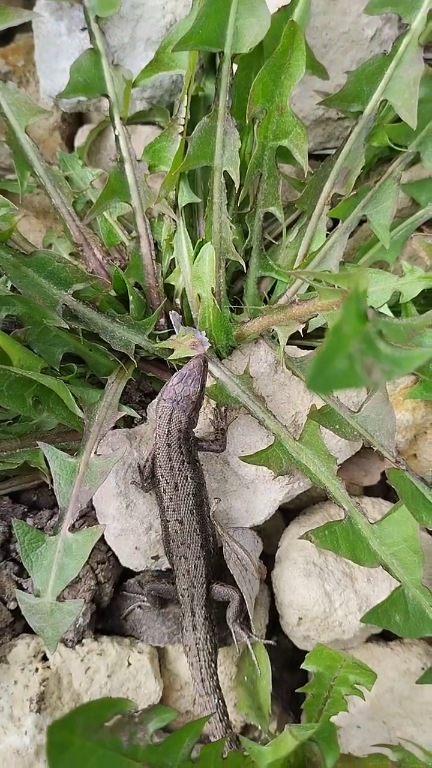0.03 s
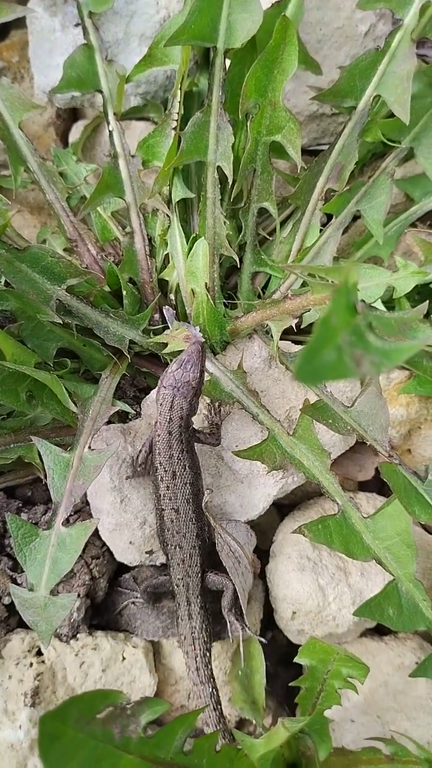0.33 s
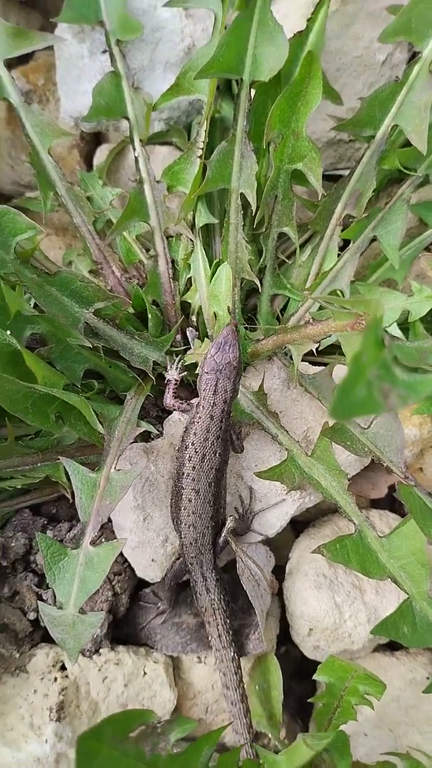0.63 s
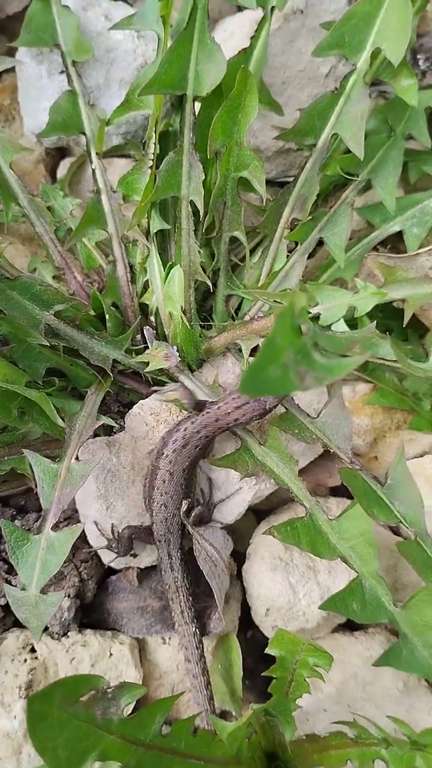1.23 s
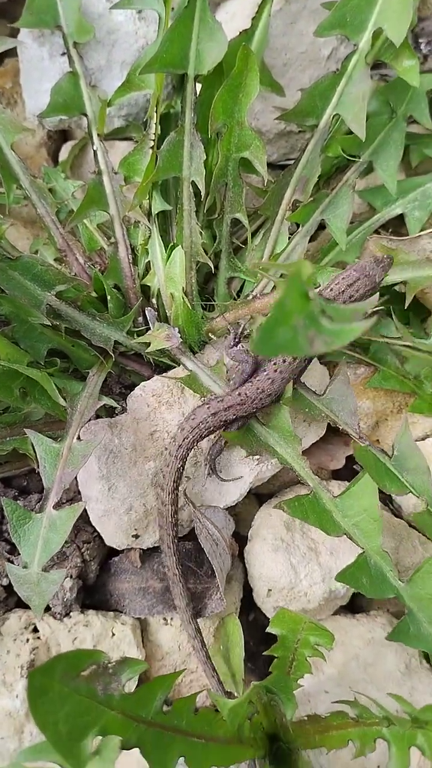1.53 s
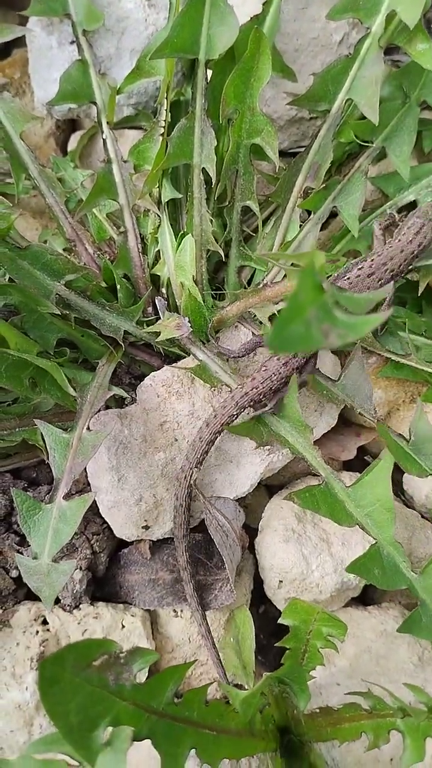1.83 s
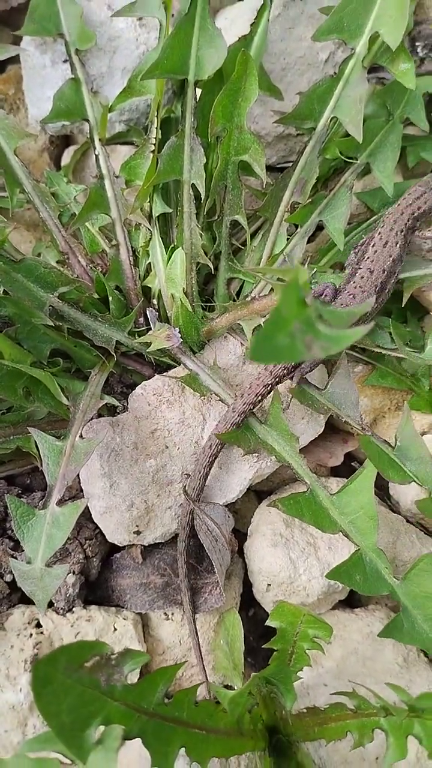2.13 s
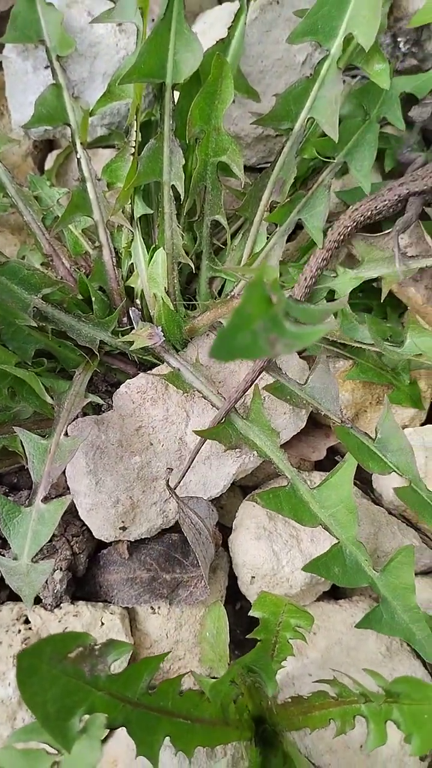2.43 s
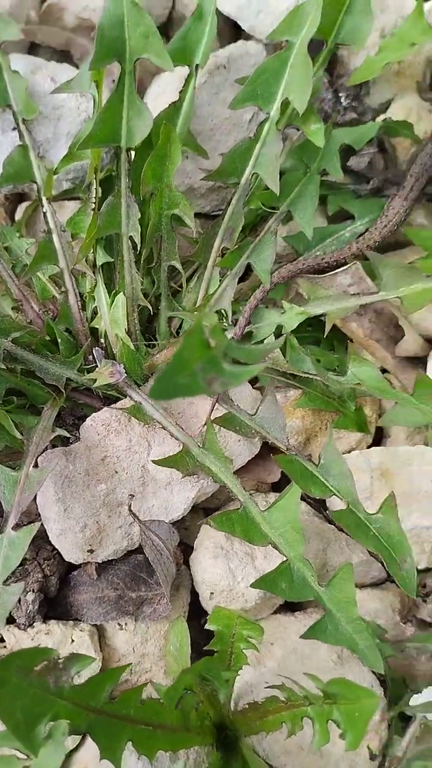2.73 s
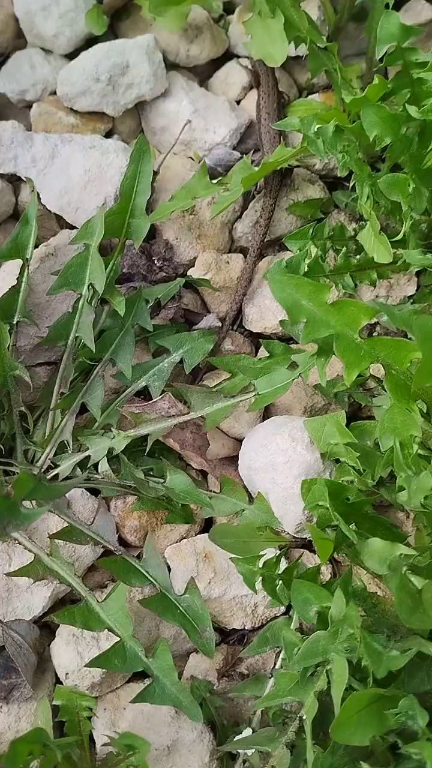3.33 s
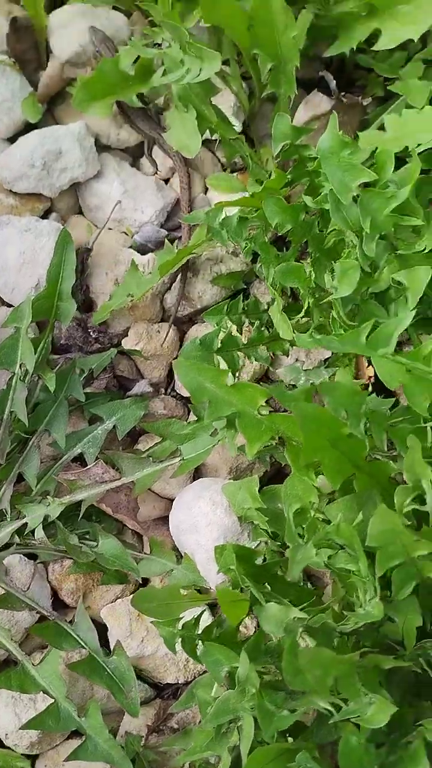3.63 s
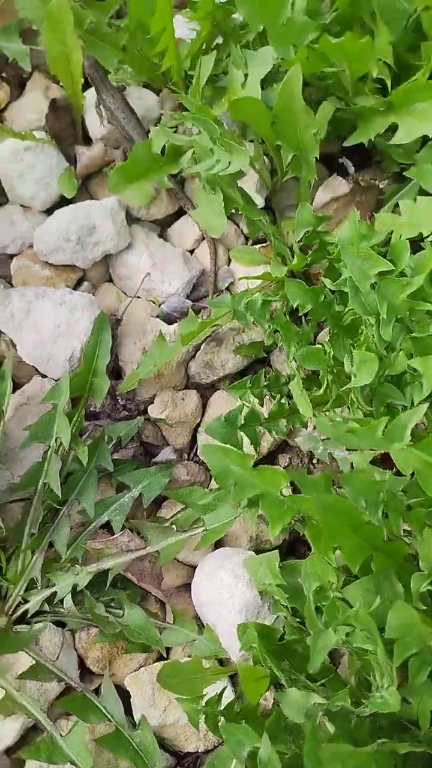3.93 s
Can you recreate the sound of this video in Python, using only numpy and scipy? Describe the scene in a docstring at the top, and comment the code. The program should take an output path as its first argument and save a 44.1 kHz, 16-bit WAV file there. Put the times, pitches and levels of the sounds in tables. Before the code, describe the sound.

A small lizard creeps, then darts over dry leaves and stones with faint ticks and crackly scrapes, close by. Low wind puffs bump the microphone more and more, over soft outdoor air and a distant machine hum.

```python
"""Among weeds, on dry leaves and stones, a small lizard creeps and then darts, close to the microphone. Its
feet tick by impact, and now and then a twig snaps; its belly scrapes by friction, in crackling strokes that can
ring a curled leaf, and at last it swishes through green leaves. A few very short, thin chirps sound above. Wind
eddies bump the microphone in separate puffs, over soft outdoor air and a distant machine hum."""
import sys
import numpy as np
from scipy import signal
from scipy.fft import rfft, irfft
from scipy.io import wavfile

SR = 44100
rng = np.random.default_rng(int(sys.argv[2]) if len(sys.argv) > 2 else 0)


def generate_wav(sig):
    """Save sig (samples, or channels by samples) to the path in sys.argv[1] as 16-bit PCM at SR."""
    pcm = np.round(np.clip(np.atleast_2d(sig).T, -1, 1) * 32767).astype(np.int16)
    wavfile.write(sys.argv[1], SR, pcm)


N = 176400
TIME, HZ = np.arange(N) / SR, np.fft.rfftfreq(N, 1 / SR)

# spectra of the steady air and of the growing wash (frequency [Hz], relative density [dB])
AIR_SPECTRUM = [(120,-11.5),(200,0.5),(280,-6),(430,-2),(560,-9),(720,-9.5),(1050,-25),(1700,-16),(2500,-20),(3300,-20.5),(5000,-25),(6800,-27.5),(8700,-18.5),(12000,-29.5),(15500,-26.5)]
WASH_SPECTRUM = [(100,10.5),(250,-1.5),(400,6.5),(700,2.5),(1000,-6.5),(1700,-5.5),(2500,-14.5),(3400,-16),(5500,-21),(8500,-22.5),(12000,-27),(16000,-25)]
# envelopes of the wash and of a mid-range hiss (time [s], level [dB])
WASH_ENVELOPE = [(0,-75.5),(1.2,-72.5),(1.9,-64.5),(2.6,-63),(2.95,-57.5),(3.25,-60.5),(3.45,-62),(3.8,-59.5),(4,-61)]
HISS_ENVELOPE = [(2.4,-76.5),(3.25,-65.5),(3.5,-67.5),(3.8,-64.5),(4,-71.5)]
# machine partials (frequency [Hz], level before the shared gain [dB])
PARTIALS = [(302,-72.5),(378,-74.5),(604,-76),(666,-82.5),(714,-80.5),(780,-77),(858,-84),(1109,-96),(1461,-82)]
# gain shared by the partials (time [s], gain [dB])
PARTIAL_GAIN = [(0,-9),(1.8,-4.5),(2.9,3.5),(4,-0.5)]
# eddies at the microphone (middle [s], level [dB], Gaussian width [s], corner frequency [Hz])
EDDIES = [(0.48,-35.5,0.029,98),(0.521,-33,0.026,56),(0.573,-41.5,0.093,74.6),(0.869,-31.5,0.012,34.5),(0.908,-34.5,0.023,74),(1.269,-39.5,0.11,69),(1.43,-32,.018,78),
          (1.746,-36,0.014,69),(1.781,-27,0.017,57.7),(1.939,-36,0.021,60.3),(2.021,-35,0.011,59),(2.055,-35,0.029,49),(2.131,-29,0.033,35.3),(2.177,-26,0.0094,125),(2.198,-34,0.039,75),(2.337,-31,0.015,48),(2.485,-30,0.022,69.4),
          (2.734,-28.5,0.016,110),(2.766,-27,0.035,103),(2.884,-36,0.036,69),(2.938,-26,0.028,98),(2.995,-27,0.07,80),(3.035,-29,0.017,108),(3.106,-38.5,0.15,82),(3.289,-24,0.019,115),(3.379,-31,0.016,85),
          (3.563,-26,0.018,70.5),(3.691,-27,0.023,64),(3.753,-35,0.03,55.4),(3.836,-18.5,0.0061,70.6),(3.873,-27.5,0.022,75.6),(3.9,-33.5,0.03,70)]
# envelope of the low wind (time [s], level [dB])
RUMBLE_ENVELOPE = [(0,-63.5),(.44,-60),(.5,-50),(1.1,-47),(1.6,-49),(2.1,-44.5),(2.6,-43.5),(3.1,-38.5),(3.45,-46),(3.7,-30.5),(4,-40)]
# spectrum of the low wind (frequency [Hz], relative density [dB])
RUMBLE_SPECTRUM = [(15,9.5),(35,8.5),(70,-2.5),(130,-12),(220,-20.5),(400,-46),(900,-99)]
# thin chirps (time [s], peak level [dB], top frequency [Hz])
THIN_CHIRPS = [(0.046,-57,11500),(1.576,-57,11600),(1.6455,-54,11300),(1.75,-51,11470),(2.0268,-51.5,10940)]
# envelope of stray leaf crackles (time [s], level [dB])
CRACKLE_ENVELOPE = [(0,-84),(1.6,-76.5),(2.3,-72),(2.9,-77.5),(3.7,-71.5),(4,-86)]
# envelope of the run through green leaves (time [s], level [dB])
SWISH_ENVELOPE = [(3.42,-87),(3.59,-64.5),(3.86,-69.5),(3.95,-80)]
# response of dry leaf under the belly (frequency [Hz], relative density [dB])
LEAF_SPECTRUM = [(1200,3.5),(2050,11),(2750,-0.5),(3300,4.5),(4600,-2),(6000,-3.5),(7300,0.5),(9300,6.5),(12300,-6.5),(14700,2.5),(16000,-13)]
# resonances of a stiff curled leaf (frequency [Hz], bandwidth [Hz], relative level [dB])
CURL_MODES = [(5300,360,13.5),(5780,360,15),(6600,190,15),(8660,280,17)]
# body and tail sliding over leaves
# (start [s], length [s], level [dB], band centre [Hz], fullest point [share of length], ring [0-1])
STROKES = [(0.375,0.1,-74,10000,0.55,0),(0.455,0.088,-64.5,15000,.4,0),(0.468,.075,-68.5,900,0.31,0),(1.23,0.088,-71,4000,1,0),(1.387,0.075,-69,4500,0.59,0),(1.543,0.12,-70.5,13000,0.34,0),(1.856,0.036,-62,4500,0.41,0.03),(1.914,0.031,-61,4800,0.42,0.15),
           (2.053,0.15,-65.5,6200,0.9,0.01),(2.299,0.17,-58,5600,0.54,0.56),(2.431,0.076,-54,6600,0.82,0.75),(2.465,0.26,-65,6600,0.17,0.3),(2.724,0.14,-61.5,6400,0.46,0.1),(3.044,0.067,-63.5,12100,0.57,0)]
# feet on dry leaves and stones, and a few sharp twig snaps (time [s], level [dB], band centre [Hz], length [s])
TICKS_AND_SNAPS = [(.438,-64,8500,.003),(1.3935,-64,5300,.0017),(1.432,-65,9200,0.0027),(1.512,-64,9050,0.0043),
                   (1.625,-57.5,613,0.01),(1.826,-61.5,2110,0.0053),(1.886,-66,4440,0.0019),(1.929,-62,5600,.004),(1.97,-61,4470,0.0087),(2.009,-61.5,5700,0.013),
                   (2.069,-60.5,9200,0.0069),(2.147,-62,9500,.003),(2.206,-61.5,9700,0.0064),(2.263,-61.5,9400,0.0032),(2.287,-57.5,5740,0.0098),(2.348,-52,7000,0.0012),(2.375,-61,5200,0.0033),
                   (2.389,-53,4700,0.0043),(2.406,-50,5600,.0065),(2.536,-60,8700,0.0067),(2.692,-57,4360,0.00087),(2.804,-61,4540,0.0058),(3.01,-59.5,8200,0.01),(3.046,-60,10000,0.0038),
                   (3.182,-63.5,9200,0.0064),(3.206,-55,9700,0.0027),(3.21,-61.5,9200,0.011),(3.3515,-62,5600,0.0011),(3.4,-58,8000,0.0015),(3.423,-62,8000,0.0064),(3.651,-53,3180,0.0021)]


def amp(db):
    """Decibels to amplitude ratio."""
    return 10 ** (np.asarray(db) / 20)


def unit_rms(x):
    """Normalisation to rms 1."""
    return x / np.sqrt(np.mean(x ** 2) + 1e-30)


def envelope(points):
    """Gain over time from (time [s], level [dB]) points."""
    return amp(np.interp(TIME, *np.transpose(points)))


def spectrum(points):
    """Gain over frequency from (frequency [Hz], level [dB]) points."""
    hz, db = np.transpose(points)
    return amp(np.interp(np.log(HZ + 1), np.log(hz + 1), db))


def band(hz, centre_hz, octaves):
    """A broad resonance, Gaussian in log frequency."""
    return np.exp(-.5 * (np.log2((hz + 1) / centre_hz) / octaves) ** 2)


def lowpass(hz, edge_hz, order):
    """Maximally flat low-pass gain."""
    return 1 / np.sqrt(1 + (hz / edge_hz) ** (2 * order))


def filtered(x, gain):
    """Filtering as multiplication of the spectrum."""
    return irfft(rfft(x) * gain, len(x))


def noise(gain):
    """Gaussian noise of rms 1 with the given spectrum."""
    return unit_rms(filtered(rng.standard_normal(N), gain))


def drift(rate_hz):
    """Low-pass random fluctuation of rms 1."""
    return noise(np.exp(-(HZ / rate_hz) ** 2))


def add(mix, start, sound):
    """Superposition of a sound from a start time in seconds."""
    at = round(start * SR)
    part = mix[max(at, 0):max(at + len(sound), 0)]
    part += sound[max(-at, 0):][:len(part)]


def air():
    """Independent noises add in power: steady outdoor air, a growing, fluttering wash and a soft hiss."""
    bed = amp(-65.5) * noise(spectrum(AIR_SPECTRUM))
    flutter = amp(1.6 * drift(rate_hz=47))
    wash = envelope(WASH_ENVELOPE) * noise(spectrum(WASH_SPECTRUM)) * flutter
    hiss = envelope(HISS_ENVELOPE) * noise(band(HZ, centre_hz=1290, octaves=.57))
    return bed + wash + hiss


def machine():
    """Random frequency modulation makes a distant machine's hum and faint partials waver."""
    def tone(hz, db, waver_hz):
        frequency = hz + waver_hz * drift(rate_hz=8.86)
        return amp(db) * unit_rms(np.sin(2 * np.pi * np.cumsum(frequency) / SR))
    hum = tone(hz=101.5, db=-56, waver_hz=.72)
    partials = sum(tone(hz, db, waver_hz=2.79) for hz, db in PARTIALS)
    return hum + envelope(PARTIAL_GAIN) * partials


def wind():
    """Turbulent pressure: eddies hit the microphone as short dull puffs over a lumpy rumble."""
    puffs, size = np.zeros(N), 16384
    t, hz = (np.arange(size) - size // 2) / SR, np.fft.rfftfreq(size, 1 / SR)
    for middle, db, width, corner_hz in EDDIES:
        swirl = rng.standard_normal(size) * np.exp(-4 * (t / width) ** 2)
        phase = np.angle(rfft(swirl))
        magnitude = (hz / corner_hz) ** .53 * lowpass(hz, corner_hz, order=3.7)
        eddy = irfft(magnitude * np.exp(1j * phase)) * np.exp(-.5 * (t / width) ** 2)
        eddy = filtered(eddy, lowpass(hz, edge_hz=273, order=8))  # limit of the quickest eddies
        add(puffs, middle + t[0], amp(db) * eddy / np.linalg.norm(eddy) * np.sqrt(width * SR))
    rumble = noise(spectrum(RUMBLE_SPECTRUM)) * amp(.75 * drift(rate_hz=11))
    return puffs + envelope(RUMBLE_ENVELOPE) * unit_rms(rumble)


def chirps():
    """Frequency sweep: a pure tone arches up and down within a few milliseconds."""
    out, length_s, arch_depth, crest = np.zeros(N), .0038, .37, .57
    progress = np.arange(0, 1, 1 / (length_s * SR))
    swell = np.sqrt(np.sin(np.pi * progress))
    for start, db, top_hz in THIN_CHIRPS:
        hz = top_hz * (1 - arch_depth * abs(progress / crest - 1) ** 2.9)
        add(out, start, amp(db) * swell * np.sin(2 * np.pi * np.cumsum(hz) / SR))
    return out


def fractures(per_s, spread_db):
    """Shot noise: tiny fractures are independent impulses of uneven size."""
    size = amp(spread_db * np.minimum(rng.exponential(1, N), 4))
    return size * rng.choice([-1, 1], N) * (rng.random(N) < per_s / SR)


def leaf_crackle():
    """Impulse response: each stray fracture in the disturbed leaves excites a brief damped ring."""
    t, decay_s = np.arange(SR // 100) / SR, .0025
    ring = rng.standard_normal(len(t)) * np.exp(-t / decay_s)
    crackle = signal.fftconvolve(fractures(per_s=200, spread_db=2), ring)[:N]
    crackle = filtered(crackle, band(HZ, centre_hz=8150, octaves=.49))
    return envelope(CRACKLE_ENVELOPE) * unit_rms(crackle)


def friction():
    """Uneven slip modulates the amplitude of a dense train of tiny snaps."""
    return fractures(per_s=5000, spread_db=3) * amp(2 * drift(rate_hz=140))


def leaf_swish():
    """Friction of soft green leaves along the body excites one narrow resonance and two weaker ones."""
    response = (band(HZ, centre_hz=8200, octaves=.22)
                + amp(-7) * band(HZ, centre_hz=3350, octaves=.16)
                + amp(-14) * band(HZ, centre_hz=14000, octaves=.3))
    contact = envelope(SWISH_ENVELOPE) * (TIME > SWISH_ENVELOPE[0][0])
    return contact * unit_rms(filtered(friction(), response))


def belly_scrapes():
    """Source and filter: dragging scales drive dry leaf and, in some strokes, a curled leaf's modes."""
    out, leaf_power = np.zeros(N), spectrum(LEAF_SPECTRUM) ** 2
    curl_power = sum(amp(db) ** 2 / (1 + (2 * (HZ - hz) / width) ** 4) for hz, width, db in CURL_MODES)
    grains = friction()
    for start, length, db, centre_hz, fullest, ring in STROKES:
        corners = start + length * np.array([0, np.clip(fullest, .05, .95), 1])
        stroke = np.interp(TIME, corners, [0, 1, 0])
        pressure = np.sin(stroke * np.pi / 2) ** 1.26
        response = np.sqrt(leaf_power + ring * curl_power / 2) * band(HZ, centre_hz, octaves=1.45)
        scrape = pressure * filtered(grains, response)
        out += amp(db) * unit_rms(scrape) * np.sqrt(np.mean(pressure ** 2))
    return out


def ticks_and_snaps():
    """Impact excitation: each footfall or twig snap drives one patch of leaf or wood in a brief noise burst
    with a faint tail."""
    out, size, tail_s = np.zeros(N), 4096, .009
    t, hz = (np.arange(size) - size // 10) / SR, np.fft.rfftfreq(size, 1 / SR)
    for start, db, centre_hz, length in TICKS_AND_SNAPS:
        pressure = np.sqrt(abs(np.sin(np.pi * np.clip(t / length, 0, 1))))
        tail = (t > length / 2) * amp(-20) * np.exp(-abs(t) / tail_s)
        resonance = band(hz, centre_hz, octaves=.27 * (9000 / centre_hz) ** .5)
        skirt = amp(-12) * band(hz, centre_hz, octaves=1)
        response = (resonance + skirt) * lowpass(hz, edge_hz=11500, order=7)
        burst = filtered((pressure + tail) * rng.standard_normal(size), response)
        add(out, start + t[0], amp(db) * burst / np.linalg.norm(burst) * np.sqrt(length * SR))
    return out


def scene():
    """Superposition of lizard, chirps, wind and background at one microphone."""
    lizard = ticks_and_snaps() + belly_scrapes() + leaf_swish() + leaf_crackle()
    return (lizard + chirps() + wind() + air() + machine())[None]


def record(dry):
    """Band limiting by a steep linear-phase low-pass filter."""
    kernel = signal.firwin(1023, cutoff=15800, window=("kaiser", 9), fs=SR)
    return signal.oaconvolve(dry, kernel[None], "same")


dry = scene()
out = record(dry)
generate_wav(out)
```